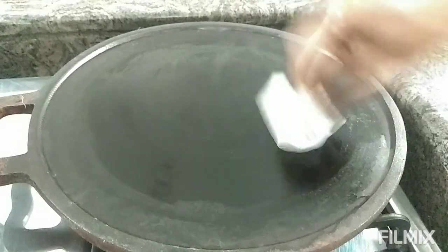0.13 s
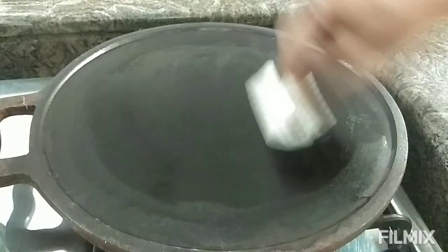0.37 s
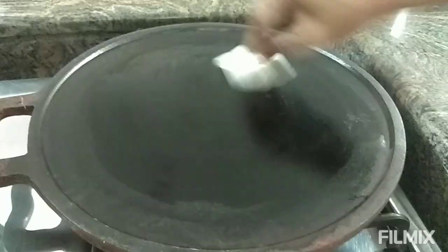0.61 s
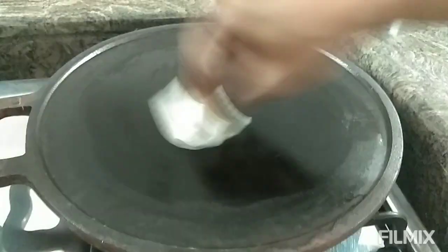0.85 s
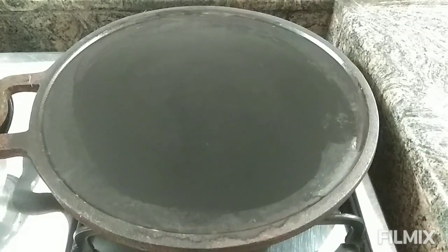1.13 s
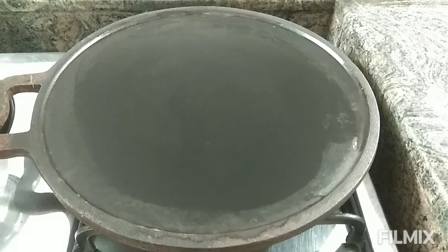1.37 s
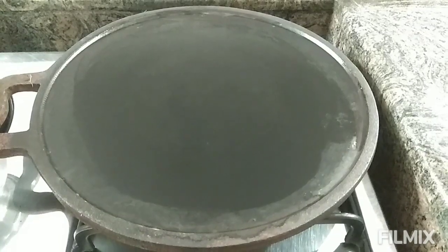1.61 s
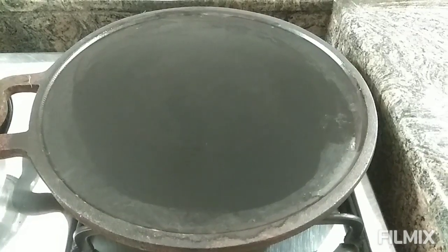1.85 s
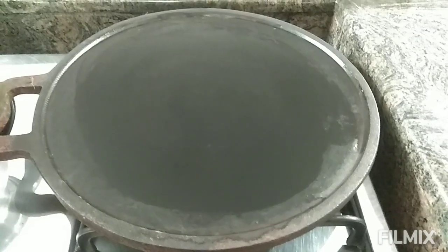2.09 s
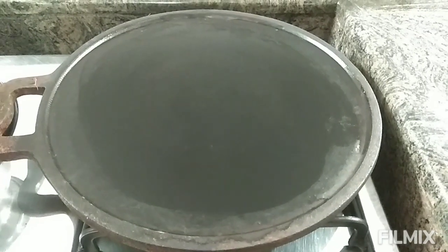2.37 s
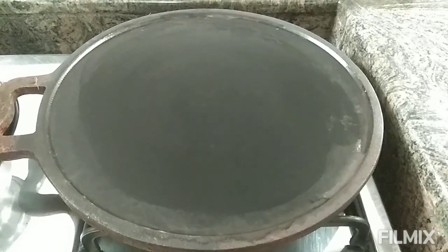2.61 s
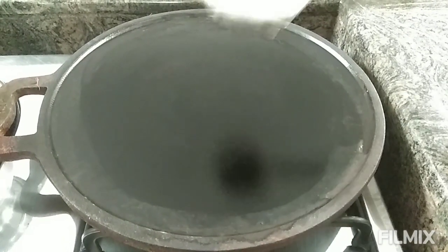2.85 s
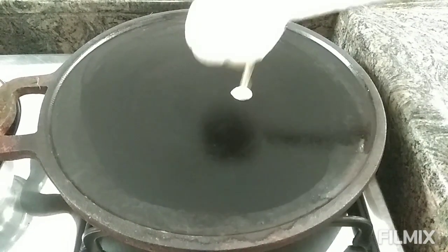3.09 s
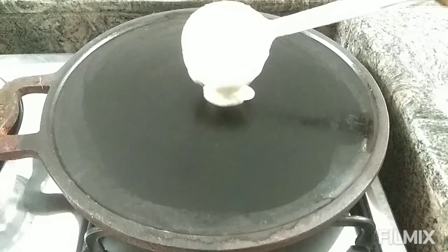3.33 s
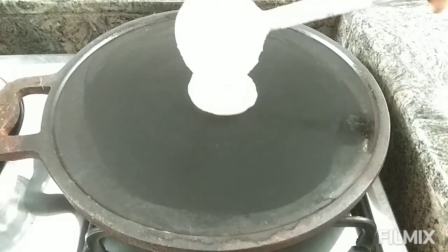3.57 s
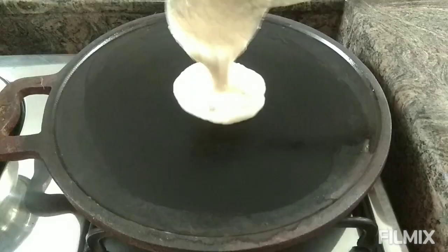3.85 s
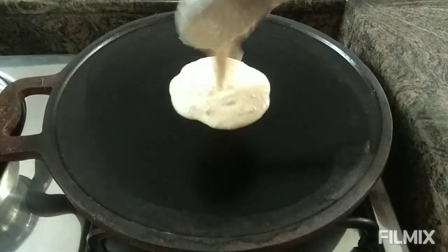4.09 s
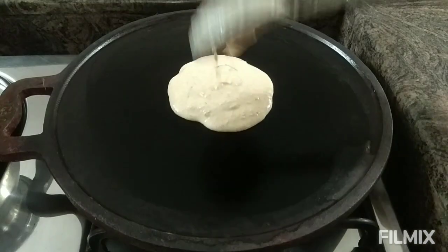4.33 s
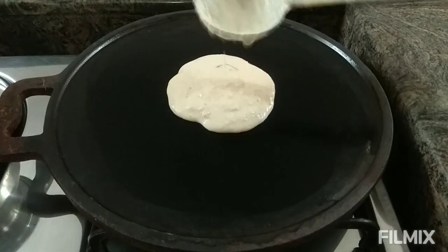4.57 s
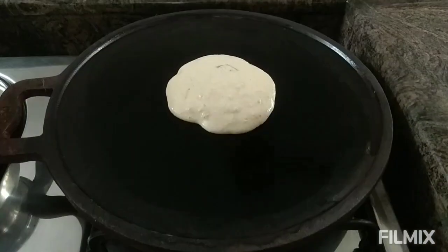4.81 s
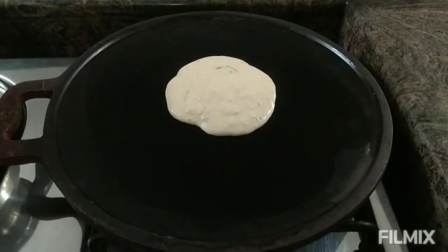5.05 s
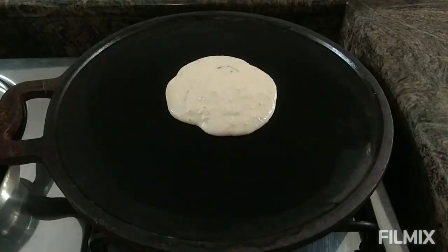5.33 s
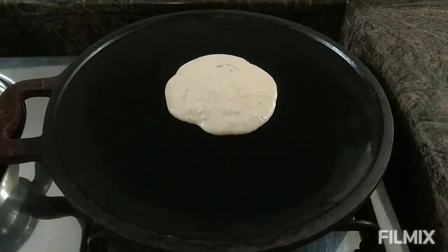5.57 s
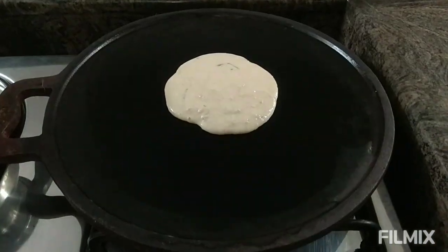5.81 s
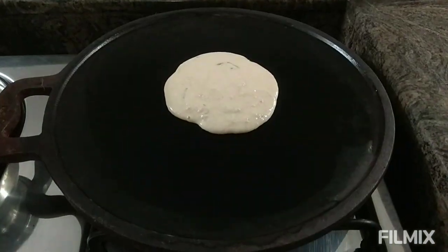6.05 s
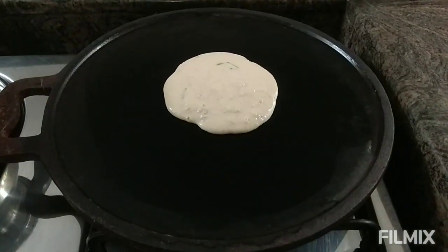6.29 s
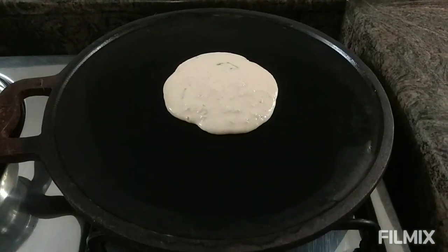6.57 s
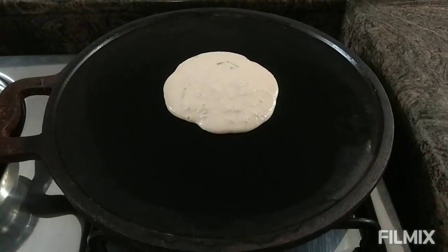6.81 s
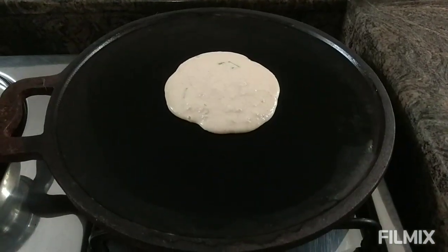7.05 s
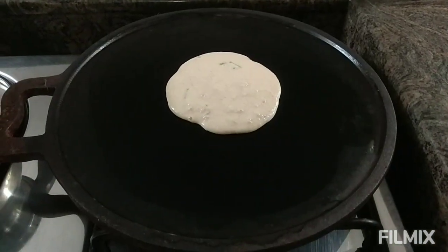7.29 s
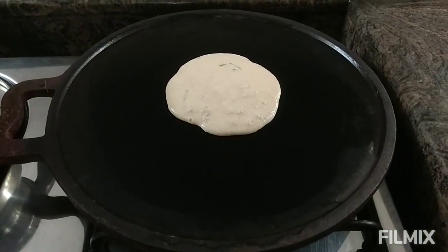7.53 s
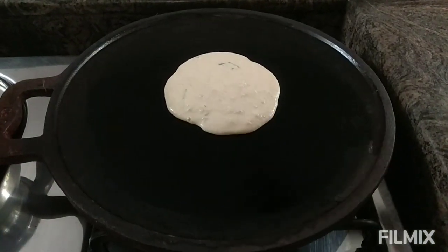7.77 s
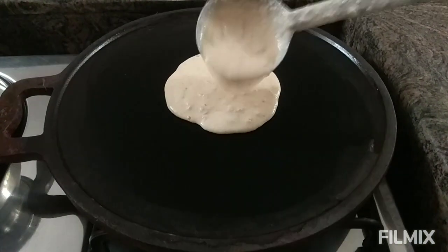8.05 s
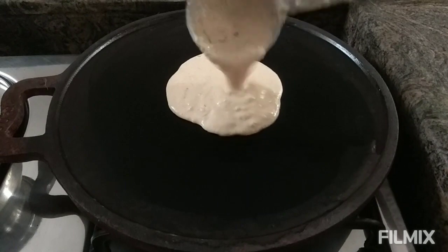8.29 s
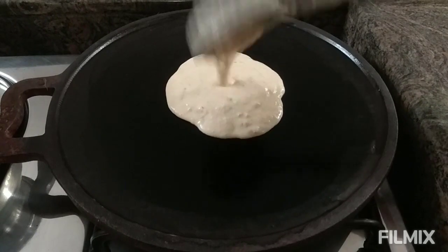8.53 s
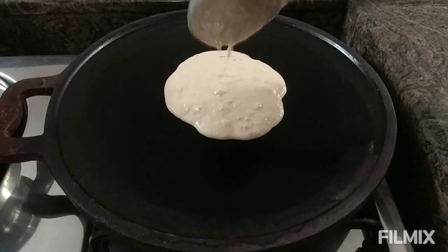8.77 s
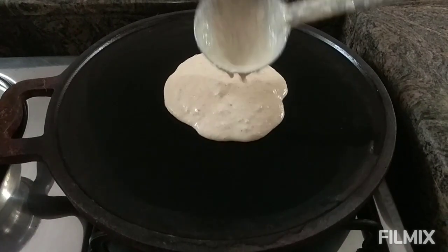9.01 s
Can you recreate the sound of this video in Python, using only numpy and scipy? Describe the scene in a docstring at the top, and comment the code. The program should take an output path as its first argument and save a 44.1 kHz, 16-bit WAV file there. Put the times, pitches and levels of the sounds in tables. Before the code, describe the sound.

Brisk paper wipes on spitting iron cut to near silence with faint swishes, before ladled batter hisses, crackles and spits, surging louder at the end.

```python
"""A paper towel rubs over a hot oily cast-iron griddle above a low murmur and a faint appliance hum.
After a cut the kitchen is quiet: distant swishes, three near rustles, a narrow burner hiss.
Batter lands and sizzles as random bursts for steam bubbles, with spits and low thumps, sputtering as the
edge dries, until a second ladleful spreads onto fresh iron and the sizzle flares again.
Noisy sources are random clicks, coloured by a spectrum and scattered to two microphone ports."""
import sys
import numpy as np
from scipy import signal
from scipy.fft import rfft, irfft
from scipy.io import wavfile
from scipy.ndimage import uniform_filter1d

SR = 44100
rng = np.random.default_rng(int(sys.argv[2]) if len(sys.argv) > 2 else 0)


def how_loud(loudness_db):
    """Turn decibels into a plain amplitude multiplier (0 dB gives 1, 20 dB gives 10)."""
    steps = np.asarray(loudness_db, float) / 20
    return 10 ** steps


def output_pcm(signal):
    """Save a mono or channel-first signal as 16-bit PCM at the path in sys.argv[1].

    Samples are clipped to [-1, 1] before scaling.
    """
    pcm = np.clip(np.atleast_2d(signal).T, -1, 1) * 32767
    wavfile.write(sys.argv[1], SR, np.round(pcm).astype(np.int16))


N = 403074
BLOCK = 4096  # samples
OFF_DB = -140
CUT_S = .968


def read(points, hz):
    """Interpolates a spectrum table over log frequency."""
    f, value = np.transpose(points)
    return np.interp(np.log(hz + 1), np.log(f + 1), value)


def column(rows, index=1, outside=OFF_DB):
    """One column of a time table, sample by sample."""
    table = np.asarray(rows)
    return np.interp(np.arange(N) / SR, table[:, 0], table[:, index], outside, outside)


def wander(hz):
    """Low-passed noise of rms 1, rolling off around hz."""
    z = rfft(rng.standard_normal(N)) / (1 + (np.fft.rfftfreq(N, 1 / SR) / hz) ** 2)
    z[0] = 0
    x = irfft(z, N)
    return x / x.std()


def swells(rows, rise_db_s, fall_db_s, rest_db=OFF_DB):
    """Level in dB of events (full_s, level_db, hold_s) that rise, hold and fall, powers summed over a rest."""
    t = np.arange(N) / SR
    power = how_loud(2 * rest_db)
    for full_s, level_db, hold_s in rows:
        rise_db = rise_db_s * np.maximum(full_s - t, 0)
        fall_db = fall_db_s * np.maximum(t - full_s - hold_s, 0)
        power = power + how_loud(2 * np.maximum(level_db - rise_db - fall_db, OFF_DB))
    return 10 * np.log10(power)


def beside_cut(level_db, after):
    """Silences a level on the other side of the cut."""
    return np.where((np.arange(N) / SR > CUT_S) == after, level_db, OFF_DB)


def causal(spectrum):
    """Minimum-phase response with the colour of a spectrum table: energy comes as early as it can."""
    hz = abs(np.fft.fftfreq(BLOCK, 1 / SR))
    log_gain = np.log(how_loud(np.maximum(read(spectrum, hz), -100)))
    return np.exp(log_gain - 1j * signal.hilbert(log_gain).imag)[:BLOCK // 2 + 1]


# direct arrival: hz, power_share_0_1
DIRECT_SHARE = [(60, 0.88), (160, 1), (600, 0.38), (1600, 0.033), (5500, 0.049), (7400, 0.48), (9200, 0.78),
                (11500, 0.19), (16000, 0.39)]


def to_ports(t60_s, lean, count=1):
    """Paths from count spots to both microphone ports: a direct arrival plus decaying scatter."""
    hz = np.fft.rfftfreq(BLOCK, 1 / SR)
    decay = how_loud(-60 * np.arange(BLOCK) / SR / t60_s)
    scatter = rng.standard_normal((count, 2, BLOCK)) * decay
    scatter /= np.linalg.norm(scatter, axis=2, keepdims=True)
    direct = np.clip(read(DIRECT_SHARE, hz), 0, 1)
    balance = how_loud(np.outer([.5, -.5], read(lean, hz)))
    return (np.sqrt(direct) + np.sqrt(1 - direct) * rfft(scatter)) * balance


def crackle(spectrum, level_db, lo_hz, hi_hz, per_s, spread_db, t60_s, lean, count=2):
    """Random bursts, few large, from spots that move every block; level_db is the rms from lo_hz to hi_hz."""
    hz = np.fft.rfftfreq(BLOCK, 1 / SR)
    in_band = (hz > lo_hz) & (hz < hi_hz)
    live = np.flatnonzero(level_db > -120)
    blocks = (live[-1] - live[0]) // BLOCK + 1
    out = np.zeros((2, N + 5 * BLOCK))
    power = 0
    for spot in range(count):
        start = max(live[0] - spot * BLOCK // count, 0)  # spots move in turn
        padded_db = np.pad(level_db, (0, 4 * BLOCK), constant_values=OFF_DB)
        level = how_loud(padded_db[start:][:(blocks + 1) * BLOCK])
        when, size, sign = rng.random((3, len(level)))
        bursts = how_loud(abs(spread_db) * np.minimum(-np.log(size), 4)) * np.sign(sign - .5)
        clicks = (when < per_s / count / SR) * bursts
        path = causal(spectrum) * to_ports(t60_s, lean, count=blocks + 1)
        band_power = 2 * np.sum(abs(path.mean(1)[:, in_band]) ** 2) / BLOCK / len(path)
        power += np.mean(clicks ** 2) * band_power
        source = (clicks * level).reshape(-1, 1, BLOCK)
        heard = irfft(rfft(source, 2 * BLOCK) * rfft(irfft(path), 2 * BLOCK))
        for half in (0, BLOCK):  # overlap-add of each block and its tail
            out[:, start + half:][:, :len(level)] += np.hstack(heard[:, :, half:half + BLOCK])
    return out[:, :N] / np.sqrt(power)


# appliance tones: hz, level_db
HUM_TONES = [(145, -65.5), (188, -61.5), (533, -64)]


def hum():
    """Faint appliance hum before the cut: sine tones that drift in pitch and strength."""
    mono = 0
    for hz, level_db in HUM_TONES:
        strength = how_loud(beside_cut(level_db + 2.2 * wander(hz=5), after=False))
        drifting_hz = hz * (1 + .015 * wander(hz=8.6))
        mono = mono + strength * np.sqrt(2) * np.sin(2 * np.pi * np.cumsum(drifting_hz) / SR)
    return mono * np.ones((2, 1))


# murmur before and after the cut: hz, density_db
NEAR_AIR = [(18, -58), (30, -17), (69, -28), (134, -4), (182, -6), (274, -7.5), (420, -8), (520, -13),
            (620, -11), (1000, -13.5), (1250, -11), (1590, -14.5), (4000, -11), (5200, -43), (8800, -120)]
FAR_AIR = [(18, -80), (30, -49), (90, -70), (119, -5), (194, -4), (370, -8.5), (450, -21), (1140, -66),
           (2080, -43), (2600, -69), (3380, -92), (5720, -120)]
# balance before and after the cut: hz, left_minus_right_db
LEAN_NEAR = [(60, 2), (180, -6), (550, 0.5), (1650, -0.5), (4970, 1.5), (15000, 3.5)]
LEAN_FAR = [(60, 1), (180, -2), (550, -3), (1650, 1.5), (4970, 2), (15000, 14)]


def murmur():
    """Low murmur of the house: dense random bursts, louder before the cut."""
    near = crackle(NEAR_AIR, beside_cut(-57, after=False), 90, 255,
                   per_s=28000, spread_db=2.5, t60_s=.013, lean=LEAN_NEAR, count=8)
    far_db = beside_cut(-78 + 2 * wander(hz=11), after=True)
    far = crackle(FAR_AIR, far_db, 90, 410, per_s=31000, spread_db=5, t60_s=.015, lean=LEAN_FAR)
    return near + far


# faint broad hiss: hz, density_db
HISS = [(300, -35), (600, 0), (1500, -2), (2400, -13), (6000, -22), (8000, -37), (13500, -63)]


def broad_hiss():
    """Faint broad hiss after the cut: bursts of very uneven size."""
    return crackle(HISS, beside_cut(-88.5, after=True), 800, 12000,
                   per_s=32000, spread_db=19, t60_s=.076, lean=LEAN_FAR)


# burner hiss: hz, density_db
GAS = [(4120, -52), (7000, -47), (8640, -1.5), (9320, -5.5), (9550, -64), (9630, -51), (10500, -48),
       (13600, -55), (22000, -120)]


def burner():
    """Narrow hiss of the burner after the cut: dense bursts in a treble band."""
    return crackle(GAS, beside_cut(-65, after=True), 7500, 10000,
                   per_s=34000, spread_db=9.5, t60_s=.05, lean=LEAN_FAR)


# rumble events: full_s, level_db, hold_s
RUMBLES = [(1.22, -72, 0.018), (6.3, -53, 0.14), (6.98, -66, .02)]
# rumble colour: hz, density_db
RUMBLE_AIR = [(30, -39), (90, -22), (130, 2), (250, -3.5), (400, -5), (700, -15), (1200, -22), (1800, -57)]


def rumbles():
    """Low rumbles that rise quickly and fade slowly."""
    level_db = swells(RUMBLES, rise_db_s=126, fall_db_s=27) + .98 * wander(hz=11)
    return crackle(RUMBLE_AIR, beside_cut(level_db, after=True), 90, 530,
                   per_s=22000, spread_db=4, t60_s=.017, lean=LEAN_FAR)


# distant swishes: full_s, level_db, hold_s
SWEEPS = [(1.06, -67, 0.079), (1.36, -52, 0.081), (1.89, -53, 0.11), (2.44, -52, 0.085)]
# swish colour: hz, density_db
BROOM = [(350, -71), (600, -51), (891, -3), (1210, -7.5), (1570, 4.5), (2100, 10.5), (2880, -10),
         (3400, -45), (4200, -16), (4800, -7.5), (5350, -35), (5900, -13.5), (7050, -8.5), (7940, -9),
         (12200, -12.5), (13000, -64)]


def broom():
    """Distant swishes as of a broom: equal bursts with a long scattered tail."""
    level_db = swells(SWEEPS, rise_db_s=177, fall_db_s=88, rest_db=-87)
    return crackle(BROOM, beside_cut(level_db, after=True), 800, 2700,
                   per_s=15000, spread_db=0, t60_s=.3, lean=LEAN_FAR)


# three light rustles: full_s, level_db, hold_s, rise_db_s, fall_db_s
RUSTLES = [(1.212, -71.5, 0.087, 63, 500), (1.78, -66, 0.2, 500.5, 97), (2.221, -66, 0.059, 1201.5, 139)]
# first, middle and last rustle: hz, density_db
CLOTH = [(240, -53), (400, -9), (719, -5), (1110, -7), (1200, -11), (1930, -0.5), (4950, -7), (5430, -8.5),
         (11000, -3), (16000, -20)]
SHUFFLE = [(1800, -40), (2700, 5), (4500, 5), (5500, -1), (6200, -36)]
SCUFF = [(240, -15), (400, -5.5), (1080, -17), (1220, -2), (2380, -16), (2850, -6.5), (8960, -6.5),
         (14000, -40)]
# crinkles around the first rustle: full_s, level_db, hold_s
CRINKLES = [(1.05, -54.5, .22), (1.092, -57, 0.007), (1.158, -50, 0.0053), (1.233, -48, .008),
            (1.272, -50, .012)]
# crinkle colour: hz, density_db
CRINKLE_COLOUR = [(3000, -27), (7000, -19), (9000, -7), (11000, 2), (13000, -15), (16000, -25)]


def rustles():
    """Three near rustles of different colour, with dry treble crinkles around the first."""
    cloth_db, shuffle_db, scuff_db = (beside_cut(swells([row[:3]], *row[3:]), after=True) for row in RUSTLES)
    cloth = crackle(CLOTH, cloth_db, 3375, 3595, per_s=6400, spread_db=6, t60_s=.028, lean=LEAN_FAR)
    shuffle = crackle(SHUFFLE, shuffle_db, 2500, 5600, per_s=13000, spread_db=1, t60_s=.038, lean=LEAN_FAR)
    scuff = crackle(SCUFF, scuff_db, 2760, 3750, per_s=9100, spread_db=1.5, t60_s=.028, lean=LEAN_FAR)
    crinkle_db = beside_cut(swells(CRINKLES, rise_db_s=1497.5, fall_db_s=900), after=True)
    crinkles = crackle(CRINKLE_COLOUR, crinkle_db, 7000, 16000,
                       per_s=8300, spread_db=2, t60_s=.015, lean=LEAN_FAR)
    return cloth + shuffle + scuff + crinkles


# towel strokes: full_s, level_db, hold_s
WIPES = [(.045, -35, 0.006), (.17, -46.5, 0.099), (.365, -41, 0.033), (.53, -50, 0.038),
         (.605, -41.5, .005), (.735, -40, 0.022), (.81, -45, 0.049)]
# towel colour: hz, density_db
TOWEL = [(880, -74), (1500, -30), (2780, -8), (3670, -5), (4340, 2.5), (6210, -0.5), (8210, 6), (8970, 5.5),
         (11600, 6), (14600, 6.5), (16100, -8)]


def towel():
    """Paper fibres drag over oily iron stroke by stroke; the spitting oil is the resting level."""
    rub_db = swells(WIPES, rise_db_s=222, fall_db_s=233, rest_db=-54.5) + .73 * wander(hz=60)
    return crackle(TOWEL, beside_cut(rub_db, after=False), 3000, 9100,
                   per_s=16000, spread_db=3, t60_s=.035, lean=LEAN_NEAR, count=5)


# batter on the iron: time_s, boil_db, wet_share_0_1
BOIL = [(3.092, -61, 0), (3.103, -29.5, 0), (3.125, -23.5, 0), (3.16, -20.5, 0.6), (3.22, -23, 0.5),
        (3.42, -24.5, 1), (3.72, -24, 0.8), (3.97, -23, 0.8), (4.2, -16.5, 0.97), (4.45, -18, 0.52),
        (5.49, -23.5, 0.18), (5.9, -21.5, 0.34), (6.22, -25.5, 0.2), (6.62, -21.5, 0.35), (7.2, -28.5, 0),
        (7.5, -25, 0), (8.21, -29.5, 0.07), (8.33, -17, 1), (8.46, -13, 1), (9.15, -12, 0.4)]
# steam breaking out at the rim (plus) or held back (minus): full_s, change_db, fade_s
FLARES = [(3.46, -5.5, 0.041), (3.748, 2, 0.8), (3.9, 4, 0.048), (6.0, 2, 0.11), (6.68, -3, 0.021),
          (6.73, 3.5, 0.019), (6.98, 2, 0.007), (7.139, 3, 0.11), (7.252, 5, 0.13), (7.69, 2.5, 0.019),
          (7.75, 1.5, 0.027), (7.86, 3, 0.08), (8.08, 3, 0.49)]


def boiling():
    """Boiling level in dB with its flares, and the share of fresh wet batter."""
    t = np.arange(N) / SR
    rise_s = .041
    flares_db = 0
    for full_s, change_db, fade_s in FLARES:
        rise = np.clip((t - full_s) / rise_s + 1, 0, 1)
        fade = np.exp(-np.maximum(t - full_s, 0) / fade_s)
        flares_db = flares_db + change_db * rise * fade
    return column(BOIL) + flares_db, np.clip(column(BOIL, index=2, outside=0), 0, 1)


# short gaps in the low band: full_s, hold_s
LOW_GAPS = [(3.108, 0.038), (3.215, .035), (4.4, 0.023), (5.386, 0.09), (5.717, 0.14), (5.917, 0.025),
            (6.057, 0.058), (6.178, 0.032), (6.64, 0.023), (7.332, .05), (7.465, 0.062), (7.904, 0.062),
            (8.231, 0.1)]


def low_gaps():
    """Depth of the low-band gaps, in dB."""
    depth_db, edge_db_s = 18, 1500
    rows = [(full_s, depth_db, hold_s) for full_s, hold_s in LOW_GAPS]
    return np.maximum(swells(rows, edge_db_s, edge_db_s), 0)


# short low thumps: start_s, start_db (before the high-pass), centre_hz
THUMPS = [(3.17, -36.5, 600), (3.28, -58, 400), (4.52, -44, 300), (5.318, -32, 266), (5.883, -30, 700),
          (6.034, -33, 1260), (6.142, -53, 1180), (6.676, -34, 394), (6.981, -31, 1000),
          (7.138, -32.5, 850), (7.268, -33, 985), (8.12, -35, 668), (8.358, -26, 600), (8.47, -41, 496),
          (8.589, -63, 300), (8.719, -28, 350), (8.96, -37, 450), (9.075, -47, 500)]


def thumps():
    """Low thumps, each a sine decaying within milliseconds."""
    t = np.arange(900) / SR
    t60_s = .0035
    out = np.zeros((2, N + BLOCK))
    for start_s, start_db, centre_hz in THUMPS:
        thump = np.sin(2 * np.pi * centre_hz * t) * how_loud(start_db - 60 * t / t60_s)
        out[:, round(start_s * SR):][:, :len(t)] += thump
    return out[:, :N]


# low noise: hz, density_db
LOW_COLOUR = [(25, -29), (70, -32.5), (200, -10.5), (487, 0), (800, -3.5), (1300, -0.5), (1700, -10),
              (2640, -83)]
# batter balance: hz, left_minus_right_db
LEAN_BATTER = [(60, 3), (92, -13), (140, 1), (210, -21), (330, -8), (500, -7.5), (770, -5.5), (1170, -1),
               (1790, -6), (2740, 1.5), (4190, -2), (6410, -6.5), (9810, 2.5), (15000, 3.5)]


def low_noise():
    """Low noise, even at first, then in short lumps after about 4.1 s; each thump has a brief low noise puff."""
    t = np.arange(N) / SR
    start_s, grows_s, lumps_s, lumps_over_s = 3.15, .3, 4.09, .15
    onset = np.clip((t - start_s) / grows_s, 1e-7, 1)
    even = np.clip(1 - (t - lumps_s) / lumps_over_s, 0, 1)
    lumps_db = abs(11 - 9 * even) * np.tanh(1.9 * wander(hz=20))
    boil_db, _ = boiling()
    noise_db = -54.5 + .64 * boil_db + 14.5 * even + lumps_db - low_gaps() + 20 * np.log10(onset)
    puffs = [(thump_s, thump_db - 22, .0053) for thump_s, thump_db, _ in THUMPS]
    puff_db = swells(puffs, rise_db_s=2500, fall_db_s=1100)
    level_db = np.where(onset > 1e-3, np.maximum(noise_db, puff_db), OFF_DB)
    return crackle(LOW_COLOUR, level_db, 100, 995, per_s=3000, spread_db=2.5, t60_s=.014, lean=LEAN_BATTER)


# loud spits: start_s, peak_db (mean of ports, before the high-pass)
SPITS = [(6.25, -10), (6.54, -4), (6.5896, -9), (6.8172, -9), (6.867, -20), (7.2513, -18), (7.4017, -4),
         (7.6167, -10), (7.648, -7), (7.68, -16), (7.6838, -7), (7.734, -10), (7.9217, -9), (7.999, -12),
         (8.059, -18), (8.0903, -9.5), (8.3, -7), (8.305, -16)]
# small bubbles, also the colour of the spits: hz, density_db
FIZZ = [(700, -66.5), (1000, -24), (1500, -21), (1900, -19.5), (2230, -14.5), (2490, -17), (2750, -14),
        (3420, -17.5), (3710, -13), (4010, -13.5), (4480, -8), (5300, -11.5), (9150, 4), (10400, 5.5),
        (13000, 0), (15700, -4), (16150, -32.5)]


def spits():
    """Single loud spits: a sharp tick with a short puff of decaying noise behind it."""
    t = np.arange(900) / SR
    out = np.zeros((2, N + BLOCK))
    for start_s, peak_db in SPITS:
        burst = .096 * rng.standard_normal(len(t)) * how_loud(-60 * t / .027)
        burst[0] = 1  # tick
        heard = irfft(rfft(burst, BLOCK) * causal(FIZZ) * to_ports(.008, LEAN_BATTER)[0])
        out[:, round(start_s * SR):][:, :BLOCK] += how_loud(peak_db) * heard / abs(heard.mean(0)).max()
    return out[:, :N]


# wet bubbles of fresh batter: hz, density_db
DEEP = [(300, -67.5), (600, -11), (900, -4), (1300, -4), (3000, 4.5), (4500, -2), (6500, 7.5), (8500, -2),
        (11000, -83.5)]


def sizzle():
    """Steam bubbles burst under the batter in quick clumps; the drying edge snaps; wet batter bubbles deeper."""
    boil_db, wet = boiling()
    sputter_db = abs(1 - wet) * (wander(hz=41.3) + .5 * wander(hz=250))
    small = crackle(FIZZ, boil_db + sputter_db, 3000, 19000,
                    per_s=7000, spread_db=3, t60_s=.048, lean=LEAN_BATTER, count=3)
    snap_db = boil_db - 1 - 14 * wet + 1.5 * wander(hz=25)
    snaps = crackle(FIZZ, snap_db, 2200, 16000,
                    per_s=500, spread_db=1.5, t60_s=.0039, lean=LEAN_BATTER, count=3)
    deep_db = -45 + 12.5 * wet + .32 * boil_db + .12 * sputter_db + .47 * wander(hz=3)
    deep_db -= .4 * low_gaps()
    deep_db[boil_db < -100] = OFF_DB
    deep = crackle(DEEP, deep_db, 400, 3480, per_s=3000, spread_db=2, t60_s=.11, lean=LEAN_BATTER)
    return small + snaps + deep


def scene():
    """Sums the sources, high-passing the thumps, spits and sizzle, and fades out and in around the cut."""
    kitchen = hum() + murmur() + broad_hiss() + burner() + rumbles() + broom() + rustles()
    highpass = signal.butter(4, 130, "highpass", fs=SR, output="sos")  # keeps deep bass out of these layers
    batter = signal.sosfilt(highpass, thumps() + spits() + sizzle())
    t = np.arange(N) / SR
    fade_out_s, gap_s, fade_in_s = .09, .008, .04
    before = (CUT_S - t) / fade_out_s
    after = (t - CUT_S - gap_s) / fade_in_s
    splice = np.clip(np.maximum(before, after), .005, 1)
    return (kitchen + towel() + low_noise() + batter) * splice


def low_pass(x):
    """Removes everything above the highest recorded frequency."""
    return signal.sosfilt(signal.butter(12, 16280, fs=SR, output="sos"), x)


# muting limit: hz, below_loudest_band_db
MUTE = [(70, -48), (160, -32), (300, -30.5), (1000, -29), (2000, -28.5), (5000, -45), (15000, -26)]
# lowest muting limit: hz, limit_db
QUIET = [(1000, -110), (3000, -105), (6000, -104), (9600, -99)]


def record(dry):
    """Soft overload, then a suppressor that mutes weak bands; weak bins are thinned too, so the noise turns
    watery and flickering."""
    knee, room = .55, .25
    over = np.maximum(abs(dry) - knee, 0)
    rounded = dry - np.sign(dry) * (over - room * np.tanh(over / room))
    hz, _, z = signal.stft(rounded, SR, nperseg=2048, noverlap=1536)
    power = abs(z) ** 2 + 1e-20
    band_db = 10 * np.log10(uniform_filter1d(power, size=5, axis=1).mean(0))
    loudest_db = 10 * np.log10(uniform_filter1d(power.mean(0), size=40, axis=0).max(0))
    limit_db = np.maximum(loudest_db + read(MUTE, hz)[:, None], read(QUIET, hz)[:, None])
    passed = np.clip((band_db - limit_db) / 6.2, .015, 1)  # opens over 6.2 dB
    around = uniform_filter1d(uniform_filter1d(power, size=24, axis=1), size=5, axis=2)
    noise_share = .68 * np.clip(hz / 2500, .3, 1)[:, None]  # of the neighbourhood; less in the bass
    thinned = np.sqrt(np.clip(1 - noise_share * around / power, .02, 1)) * 1.067
    mix = signal.istft(z * passed * thinned, SR, nperseg=2048, noverlap=1536)[1][:, :N]
    return low_pass(mix)


dry = scene()
out = record(dry)
output_pcm(out)
```